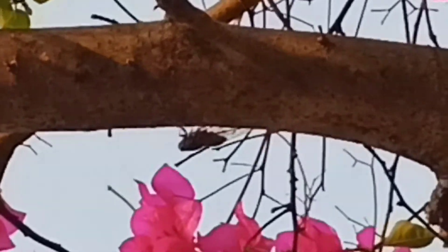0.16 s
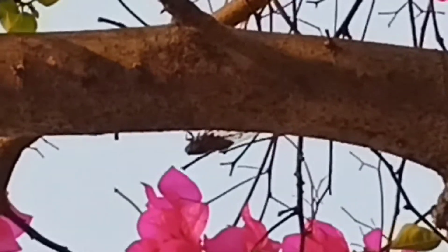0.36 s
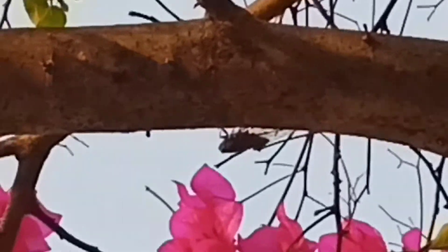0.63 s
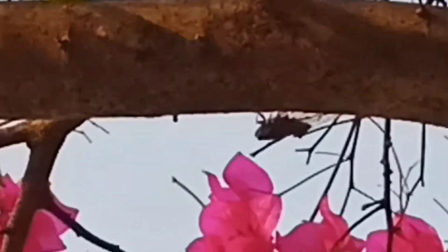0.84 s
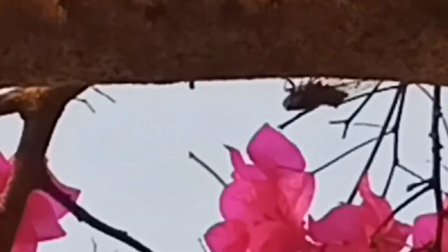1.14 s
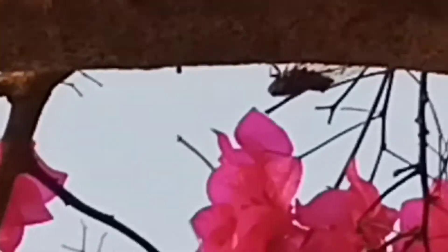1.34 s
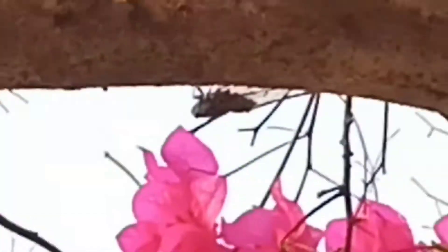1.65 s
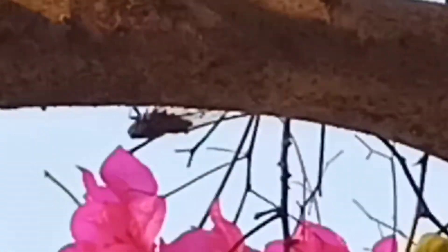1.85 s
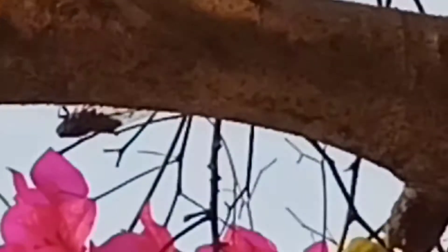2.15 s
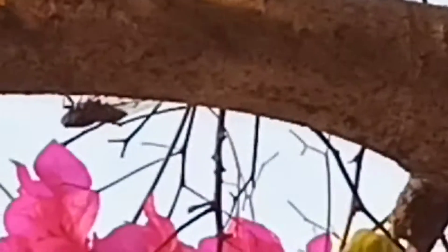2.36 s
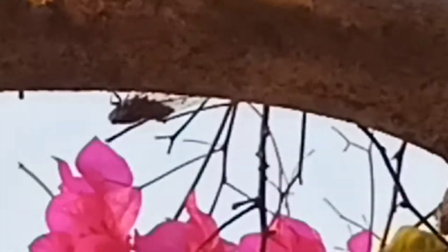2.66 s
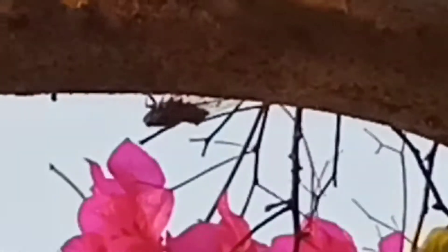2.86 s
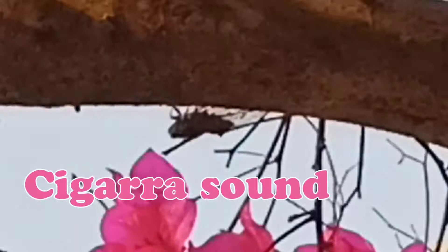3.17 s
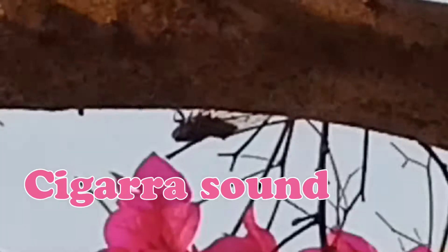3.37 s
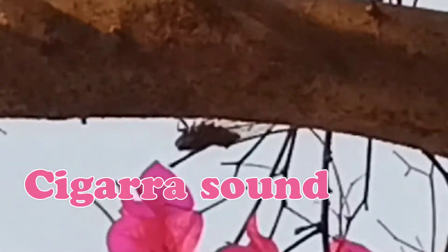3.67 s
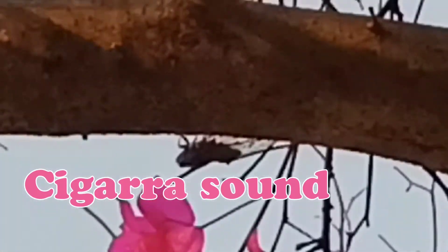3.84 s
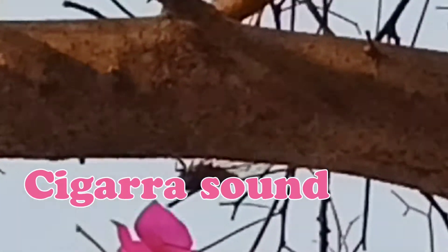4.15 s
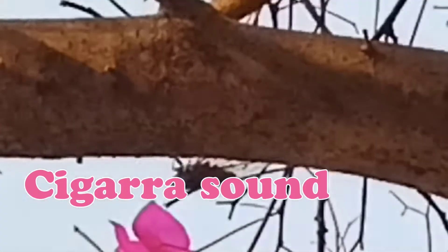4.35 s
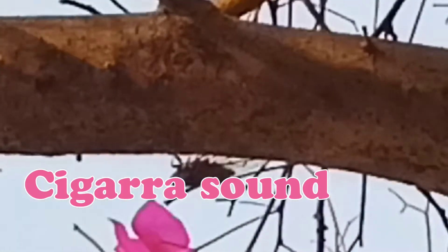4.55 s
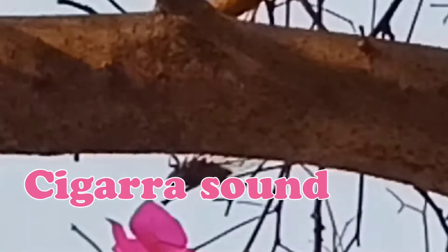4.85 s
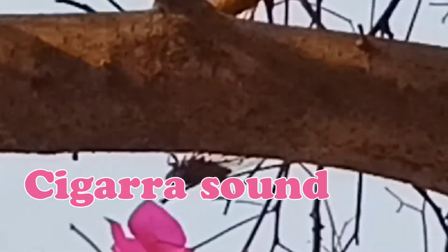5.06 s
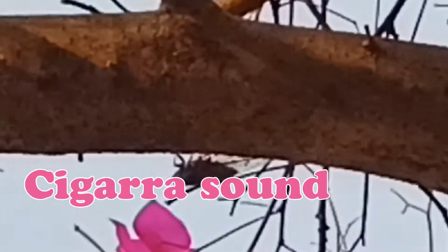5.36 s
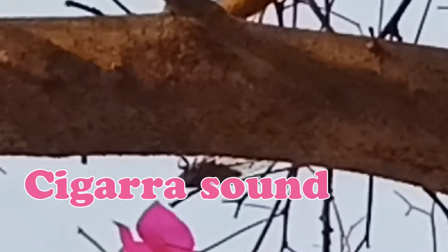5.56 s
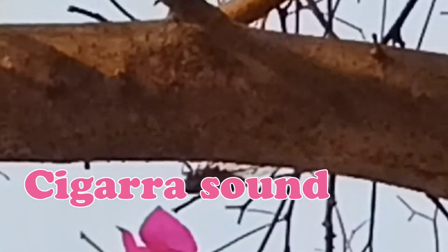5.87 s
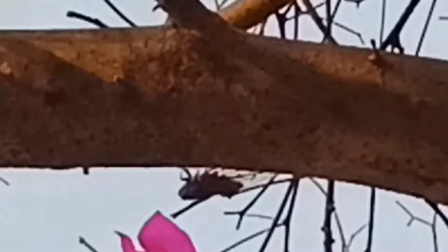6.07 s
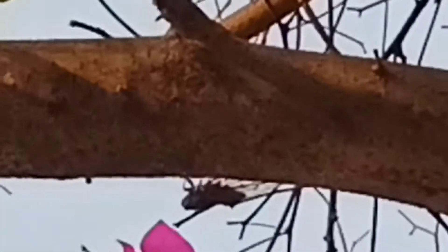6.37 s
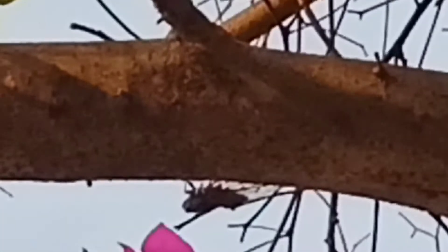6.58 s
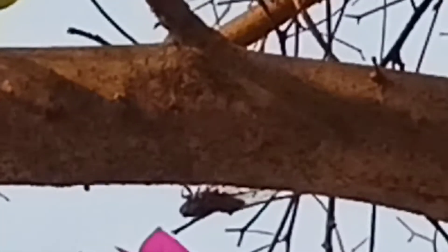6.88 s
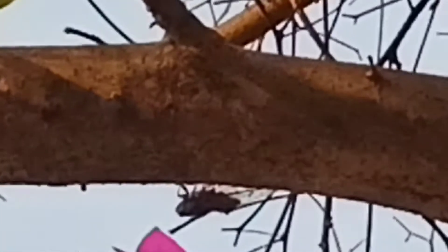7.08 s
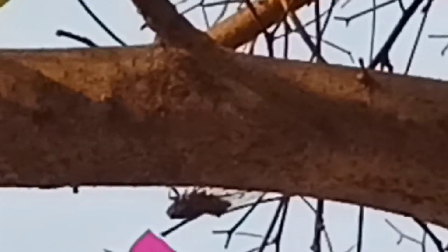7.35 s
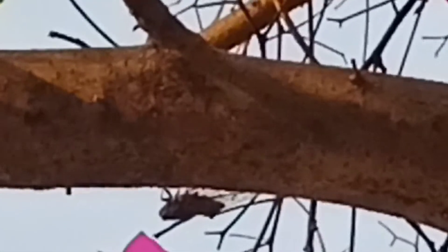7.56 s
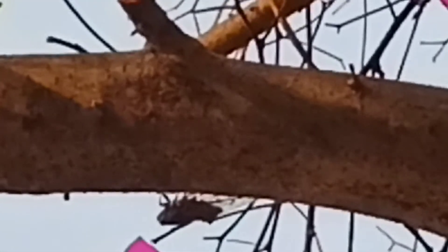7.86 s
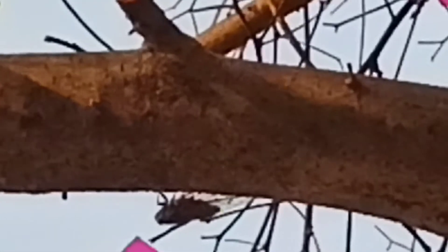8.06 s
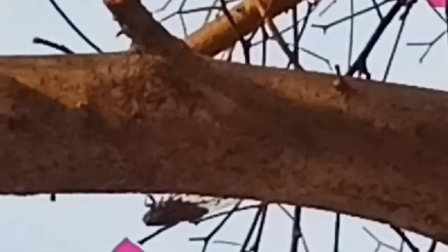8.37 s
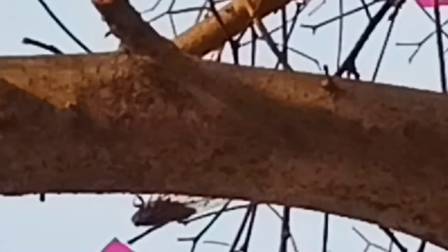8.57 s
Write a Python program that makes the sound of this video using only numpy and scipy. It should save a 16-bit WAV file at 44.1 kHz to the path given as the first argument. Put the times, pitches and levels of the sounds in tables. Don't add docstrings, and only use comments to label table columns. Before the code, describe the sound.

Piercing continuous cicada drone under a tree branch, over faint town hum, with twig ticks, brief bird whistles and a late distant motorbike.

```python
import sys
import numpy as np
from scipy import signal
from scipy.fft import rfft, irfft, next_fast_len
from scipy.io import wavfile
from scipy.ndimage import uniform_filter1d, map_coordinates

SR = 44100
rng = np.random.default_rng(int(sys.argv[2]) if len(sys.argv) > 2 else 0)


def materialize(psi):
    bounded = np.clip(np.atleast_2d(psi).T, -1, 1)
    quanta = np.round(bounded * 32767).astype(np.int16)
    wavfile.write(sys.argv[1], SR, quanta)


def how_loud(loudness_db):
    steps = np.asarray(loudness_db, float) / 20
    return 10 ** steps


N = 384552
TIME = np.arange(N) / SR


def noise():
    return rng.standard_normal(N)


def unit(x):
    return x / np.sqrt(np.mean(x ** 2) + 1e-20)


def steady(x):
    return x / np.sqrt(np.abs(uniform_filter1d(x * x, size=SR // 3)) + 1e-9)


def curves(rows):
    s, *columns = np.transpose(rows)
    return [np.interp(TIME, s, column) for column in columns]


def wobble(rate):
    return map_coordinates(rng.standard_normal(int(N * rate / SR) + 4), [TIME * rate])


def bumps(modes, f):
    return sum(db * np.exp(-((f - hz) / w) ** 2) for hz, w, db in modes)


def filtered(x, response):
    m = next_fast_len(N + 8192)
    return irfft(rfft(x, m) * response(np.fft.rfftfreq(m, 1 / SR)), m)[:N]


def above(x, edge_hz, soft_hz):
    return filtered(x, lambda hz: 1 / (1 + np.exp((edge_hz - hz) / soft_hz)))


def coloured(x, points, modes=()):
    f, db = np.transpose(points)
    hz = np.fft.rfftfreq(4096, 1 / SR)
    gain_db = np.interp(np.log(hz + 1), np.log(f), db) + bumps(modes, hz)
    cepstrum = irfft(np.log(how_loud(gain_db) + 1e-4))
    cepstrum[1:2048] *= 2
    cepstrum[2049:] = 0
    return unit(signal.fftconvolve(x, irfft(np.exp(rfft(cepstrum))))[:N])


def snaps(turns, lag, scatter, spread_db):
    whole = np.arange(1, int(turns[-1]))
    luck = rng.standard_normal((len(whole), 2))
    at = np.interp(whole + lag, turns, np.arange(N))
    at = np.interp(whole + lag + scatter[at.astype(int)] * luck[:, 0], turns, np.arange(N))
    return np.bincount(at.astype(int), how_loud(spread_db * luck[:, 1]), N)


def rib_clicks(turns, scatter):
    inward = snaps(turns, 0, scatter, spread_db=1.5)
    inward = inward + how_loud(-8) * snaps(turns, .06, 2 * scatter, spread_db=3)
    outward = snaps(turns, .36, 1.8 * scatter, spread_db=3)
    outward = outward + how_loud(-4) * snaps(turns, .5, 2.5 * scatter, spread_db=3)
    return inward + how_loud(-6) * outward


def belly_ring(ribs, shape):
    # (frequency [Hz], level [dB per Hz])
    membrane = [(2500, -79), (3900, -42.5), (4500, -31), (5000, -16), (5600, -9.5), (6400, -6.5),
                (7000, -4), (8800, -3), (9500, -10), (10200, -20.5), (10700, -33), (13000, -31),
                (20000, -105)]
    # (frequency [Hz], width [Hz], level [dB])
    belly = [
        [(5900, 1000, -5), (7100, 230, 7.5), (7680, 200, -4), (8750, 130, 1), (9290, 190, 10.5)],
        [(5800, 900, -4), (6950, 230, 7), (7550, 200, -3), (8700, 130, 1), (9170, 180, 9.5)],
        [(5800, 900, -2), (6850, 300, 6), (7700, 300, 1), (8700, 200, 5), (9500, 400, -4)],
        [(5800, 900, 0), (6850, 200, 4), (8050, 300, 3), (9150, 200, 3), (10050, 200, 5)],
        [(5600, 900, 2), (6500, 400, 3), (7500, 500, 3), (8600, 300, 2), (9900, 300, 0)],
    ]
    clicks = ribs + how_loud(-15.5) * noise()
    ring = np.zeros(N)
    for k, modes in enumerate(belly):
        share = np.clip(1 - np.abs(np.minimum(shape, len(belly) - 1) - k), 0, 1)
        ring += share * coloured(clicks, membrane, modes)
    return ring


def scraping(ribs, pump, rasp):
    # (frequency [Hz], level [dB per Hz])
    hiss_colour = [(8000, -37), (10500, 2.5), (12000, -1), (13500, 1.5), (15500, 1.5), (17000, -7)]
    # (frequency [Hz], level [dB per Hz])
    rasp_colour = [(11000, -30), (12400, -12), (13100, -3), (13550, 0), (14100, -7), (15300, -10),
                   (17000, -14)]
    closing = np.exp(5 * (np.cos(pump - 1.7) - 1))
    opening = np.exp(5 * (np.cos(pump - 4.1) - 1))
    scrape = (closing + .3 * opening) * how_loud(2.5 * wobble(22))
    grit = (0.48 + 3 * uniform_filter1d(ribs, size=16)) * noise()
    return coloured(grit, hiss_colour) + 1.05 * rasp * coloured(grit * (.15 + scrape), rasp_colour)


def click_drone(turns, scatter):
    # (multiple of the click rate, level [dB])
    tones = [(1, -60), (2, -63), (3, -67), (4, -70), (5, -71)]
    even = np.clip(1.3 - 17 * scatter, 0, 1) * how_loud(3.5 * wobble(10))
    return even * sum(how_loud(db) * np.sin(2 * np.pi * k * turns) for k, db in tones)


def cicada():
    # (time [s], level [dB])
    effort = [(0, -20), (.2, -21), (.35, -18.5), (.75, -18), (1.2, -20), (1.72, -19), (2.05, -17),
              (2.3, -19.5), (3, -19), (4, -19), (4.6, -19.5), (5.3, -19.5), (5.6, -20), (6.1, -18.5),
              (6.9, -20), (7.3, -18), (7.8, -19), (8.3, -18.5)]
    # (time [s], rate [clicks per s], timing scatter [cycles])
    buckling = [(0, 452, .03), (.14, 446, .02), (.63, 430.3, .017), (1.3, 423, .017), (1.89, 420, .02),
                (2.5, 431, .02), (3.16, 443, .022), (4.86, 447, .03), (5.6, 446, .05), (8.72, 445, .07)]
    # (time [s], stroke depth [dB])
    pumping = [(0, 7), (.17, 2.5), (.24, -0.4), (2.2, 0.9), (2.35, 0.4), (3, 4), (3.27, 3.4), (3.43, 4),
               (3.7, 2.5), (4.1, 1), (4.5, -0.2), (5.27, -1), (5.4, 3), (5.75, 2), (6.5, 3.5), (6.9, 4.5),
               (8.1, 3.5), (8.72, 4)]
    # (time [s], strokes so far [count])
    strokes = [(.015, 0), (.17, 3), (.234, 4), (2.28, 6), (2.766, 19), (3.186, 30), (3.319, 33),
               (3.919, 48), (4.373, 59), (4.73, 67), (5.326, 79), (5.416, 81), (5.679, 86), (6.304, 99),
               (7.417, 123), (8.345, 142), (8.718, 150)]
    # (time [s], belly shape [number])
    posture = [(0, 4), (.15, 4), (.18, 1.6), (.45, 0), (.6, 0), (1.5, 1), (1.75, 2), (2.1, 2), (2.4, 3),
               (4.9, 3), (5.35, 3.85), (6, 4), (8.72, 5)]
    # (upper level [dB], sizzle level [dB], share of the stroke felt by the low band, rasp [0-1])
    voicing = [(-2, -18.5, 0, 0), (-1.5, -19, 0, 0), (-7, -16.5, 0, 0), (-3.5, -16.5, -0.52, .25),
               (-3.5, -14, 0.23, 0.99), (-8, -15, 0.36, .5)]
    rim_shut_db = [0, 0, 0, 9, 3, 2]
    settle_s, settle_half_s = 0.24, 0.11
    hitch_s, hitch_half_s = 5.14, 0.018

    (low_db,), (shape,), (depth_db,) = curves(effort), curves(posture), curves(pumping)
    rate, scatter = curves(buckling)
    upper_db, sizzle_db, low_share, rasp = (
        np.interp(shape, np.arange(len(voicing)), column) for column in np.transpose(voicing))
    upper_db = upper_db - 0.89 * depth_db
    upper_db = upper_db - 8 * np.exp(-((TIME - hitch_s) / hitch_half_s) ** 2)
    sizzle_db = sizzle_db + 5.5 * np.exp(-((TIME - settle_s) / settle_half_s) ** 2)
    rasp = rasp * (TIME > settle_s)

    pump = 2 * np.pi * curves(strokes)[0]
    stroke = np.cos(pump) - 0.24 * np.cos(2 * pump + 0.1)
    opening_db = depth_db * how_loud(1.1 * wobble(7.8)) * stroke
    turns = np.cumsum(rate * (1 + 0.016 * rasp * np.cos(pump))) / SR
    ribs = rib_clicks(turns, scatter)

    ring = belly_ring(ribs, shape)
    upper = above(ring, 8400, 300)
    low = how_loud(low_db + low_share * opening_db) * steady(ring - upper)
    rim = above(upper, 9350, 150)
    rim_db = np.interp(shape, np.arange(len(rim_shut_db)), rim_shut_db) * np.minimum(stroke, 0)
    upper = upper + (how_loud(rim_db) - 1) * rim
    song = low + how_loud(upper_db + low_db + 1.55 * opening_db) * steady(upper)

    sizzle = how_loud(low_db + sizzle_db) * steady(scraping(ribs, pump, rasp))
    return song, sizzle + click_drone(turns, scatter)


def branch(x):
    # (delay [ms], level [dB])
    returns = [
        (1.6, -38),
        (5.1, -14),
        (11.3, -17),
    ]
    # (frequency [Hz], width [Hz], level [dB])
    notches = [(6720, 108, -5), (8463, 47, -8.5), (8630, 53, -1), (9860, 55, -5.5), (6530, 44, 5),
               (6770, 37, 11), (7180, 55, 2), (7650, 92, 1), (7950, 60, 0.5), (9170, 100, -1),
               (8870, 22, -4), (9810, 54, 8.5), (10140, 55, 5)]

    def response(f):
        echoes = sum(how_loud(db) * np.exp(-2j * np.pi * f * ms / 1000) for ms, db in returns)
        return (1 + echoes) * how_loud(bumps(notches, f))

    heard = filtered(x, response)
    return heard * np.std(x) / np.std(heard)


def town():
    # (frequency [Hz], level [dB per Hz])
    wash_colour = [(18, -40), (40, -8.5), (100, 0.5), (170, -2), (400, -5), (700, -9), (1000, -14),
                   (1600, -13.5), (2300, -16.5), (3200, -17.5), (4500, -15.5), (6000, -46.5)]
    # (frequency [Hz], level [dB])
    hum = [(172.3, -60)]
    wash = coloured(noise(), wash_colour)
    bright = wash - uniform_filter1d(wash, size=40)
    out = np.zeros(N)
    for part in (wash - bright, bright):
        out += how_loud(-50.5 + 1.3 * wobble(4) + 1.2 * wobble(9)) * part
    for hz, db in hum:
        out += how_loud(db + 3 + 2.2 * wobble(5)) * np.sin(2 * np.pi * hz * TIME + .5 * wobble(3))
    return out


def rustles():
    # (time [s], half length [s], frequency [Hz], width [Hz], level [dB])
    hisses = [
        (.25, .3, 4300, 400, -59),
        (2.55, .17, 1950, 300, -59.5),
        (4.7, .12, 1900, 250, -58),
    ]
    out = np.zeros(N)
    for s, half_s, hz, width, db in hisses:
        band = unit(filtered(noise(), lambda f: np.exp(-((f - hz) / width) ** 2)))
        out += how_loud(db) * np.exp(-((TIME - s) / half_s) ** 2) * band
    return out


def small_hits():
    # (time [s], peak level [dB], frequency [Hz], 60 dB decay [s])
    ticks = [(0.1301, -42, 1816, 0.012), (0.5671, -36.5, 1867, 0.0093), (0.9308, -44, 1350, 0.0067),
             (1.5078, -38.5, 1840, 0.0085), (1.9634, -51, 1680, 0.012), (2.9033, -45, 2200, 0.01),
             (3.3493, -50, 2390, 0.012)]
    # (time [s], level [dB], frequency [Hz], 60 dB decay [s])
    knocks = [
        (1.34, -50, 415, .2),
        (1.5, -48, 405, .2),
        (1.56, -52, 680, .15),
        (2.0, -49, 120, .2),
        (3.28, -50, 165, .3),
    ]
    out, t = np.zeros(N + SR), TIME[:SR // 2]
    for hits, attack_s in ((ticks, .0004), (knocks, .015)):
        for s, db, hz, t60 in hits:
            envelope = how_loud(db + 12.0 - 60 * t / t60) * (1 - np.exp(-t / attack_s))
            out[round(s * SR):][:len(t)] += envelope * np.sin(2 * np.pi * hz * t)
    return out[:N]


def birds():
    # (time [s], pitch [Hz], level [dB])
    whistles = [
        [(.37, 3900, -64), (.42, 3850, -55), (.5, 3650, -57), (.58, 3430, -55), (.63, 3350, -66)],
        [(2.535, 4050, -64), (2.55, 3850, -48), (2.58, 3300, -47), (2.592, 3050, -60), (2.605, 2800, -57),
         (2.635, 2500, -51), (2.655, 2250, -60), (2.685, 1900, -57), (2.72, 1600, -62)],
    ]
    out, t = np.zeros(N), TIME[:SR // 4]
    for rows in whistles:
        hz, db = curves(rows)
        sounding = (TIME > rows[0][0]) * (TIME < rows[-1][0])
        out += how_loud(db + 3 * wobble(120)) * np.sin(2 * np.pi * np.cumsum(hz) / SR) * sounding
    tail = how_loud(-60 * t / .3) * rng.standard_normal(len(t))
    return out + how_loud(-5) * signal.fftconvolve(out, tail / np.linalg.norm(tail))[:N]


def bursts(turns, scatter, spread_db, decay_s, rate):
    luck = rng.standard_normal((int(turns[-1]) + 2, 2))[turns.astype(int)]
    age = (turns % 1 - .25 - np.clip(scatter * luck[:, 0], -.24, .4)) / rate
    return how_loud(spread_db * luck[:, 1]) * np.exp(-np.abs(age) / decay_s) * (age >= 0)


def motorbike():
    # (time [s], distance [m])
    approach = [(4.85, 63), (5.6, 75), (6.95, 41.6), (7.2, 27), (7.5, 28.4), (8, 20.6), (8.25, 17),
                (8.52, 9.4), (8.72, 12.3)]
    # (time [s], rate [firings per s])
    engine = [(4.85, 26.4), (6, 25.4), (7, 24.8), (7.7, 24.2), (8.05, 25.3), (8.72, 26.9)]
    # (level at 10 m [dB], share of the distance loss)
    at_ten_m = [
        (-43.5, 0.46),
        (-35, 1.14),
        (-38, 0.99),
    ]
    # (frequency [Hz], level [dB])
    thump_colour = [(35, -51), (70, -6), (100, 8.5), (135, 11.5), (190, -26), (300, -19)]
    # (frequency [Hz], level [dB])
    pipe_colour = [(88, -27), (150, -3.5), (227, -1.5), (279, -8.5), (380, -1), (724, -12), (900, -10.5),
                   (1170, -48), (1980, -120)]
    # (frequency [Hz], level [dB per Hz])
    clatter_colours = [
        [(500, -28), (900, -7), (1350, -1), (1700, -7), (2200, -13), (2900, -11.5), (3500, -14.5), (4500, -21),
         (6000, -41)],
        [(500, -30), (900, -12), (1300, -8.5), (1850, -3.5), (2400, -10.5), (3000, -9.5), (3600, -10.5),
         (4500, -16), (6000, -47)],
    ]

    metres, = curves(approach)
    rate, = curves(engine)
    thump_db, pipe_db, clatter_db = (db - share * 20 * np.log10(metres / 10) for db, share in at_ten_m)
    thump_db = thump_db + 1.5 * (rate.mean() - rate)
    turns = np.cumsum(rate) / SR
    firing = bursts(turns, 0.014, spread_db=1.5, decay_s=0.0053, rate=rate)
    gate = bursts(turns, .03, spread_db=0.5, decay_s=0.0061, rate=rate) + 2.5

    thump = coloured(firing, thump_colour)
    pipe = coloured(gate * noise() + 1.76 * firing, pipe_colour)
    far_rattle, near_rattle = (coloured(gate * noise(), colour) for colour in clatter_colours)
    near = np.clip((21 - metres) / (21 - 11.7), 0, 1)
    clatter = np.sqrt(1 - near) * far_rattle + np.sqrt(near) * near_rattle
    bike = how_loud(thump_db) * thump + how_loud(pipe_db) * pipe + how_loud(clatter_db) * clatter
    return bike * np.clip((TIME - 4.95) / .35, 0, 1)


def scene():
    song, sizzle = cicada()
    mix = branch(song) + sizzle + town() + rustles() + small_hits() + birds() + motorbike()
    return np.tile(mix, (2, 1))


def low_pass(x):
    return signal.sosfilt(signal.butter(12, 16680, fs=SR, output="sos"), x)


def record(dry):
    bent = dry[0] + how_loud(-23.5) * filtered(dry[0] ** 2, lambda hz: hz / (hz + 150))
    bent = bent / (1 + np.abs(bent / .9) ** 6) ** (1 / 6)
    top_hz = 15550
    kept = filtered(bent, lambda hz: np.clip((top_hz - hz) / 60, 0, 1) / (1 + (30 / (hz + 1)) ** 4))
    return low_pass(np.tile(kept, (2, 1)))


dry = scene()
out = record(dry)
materialize(out)
```